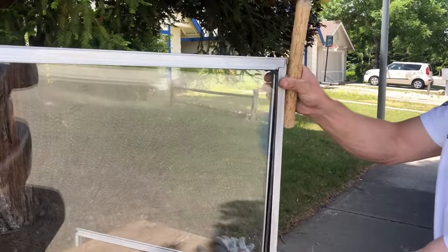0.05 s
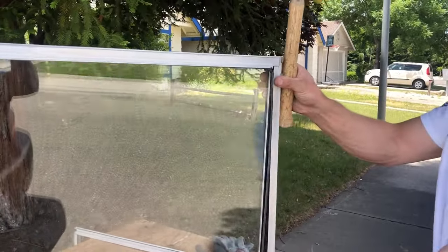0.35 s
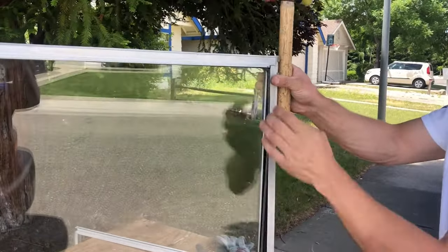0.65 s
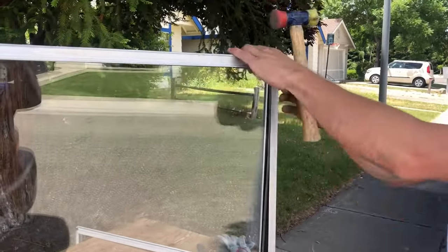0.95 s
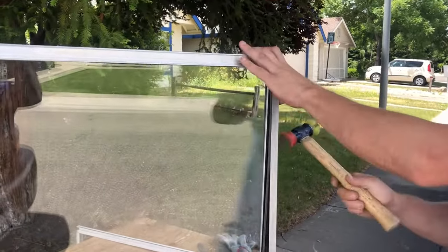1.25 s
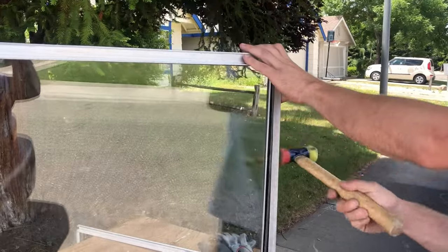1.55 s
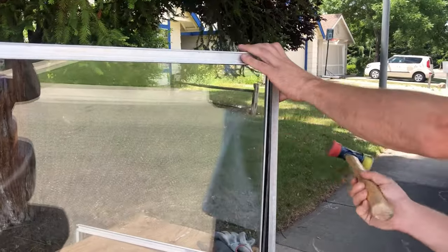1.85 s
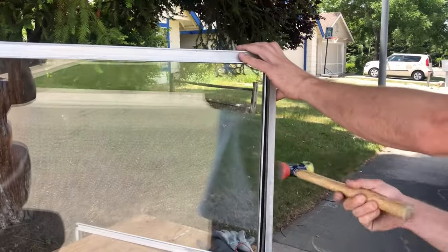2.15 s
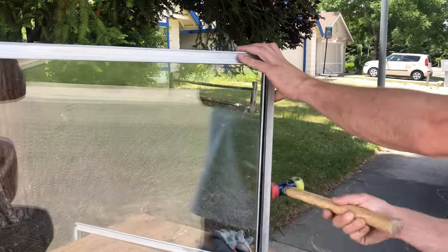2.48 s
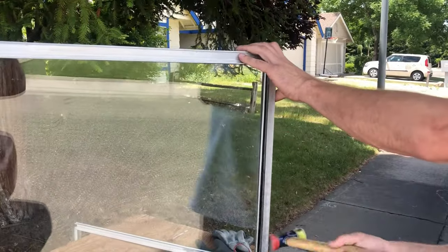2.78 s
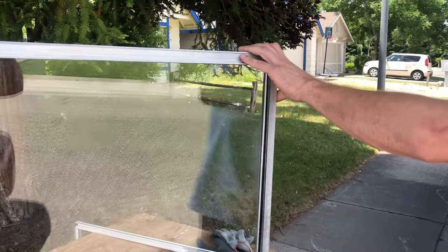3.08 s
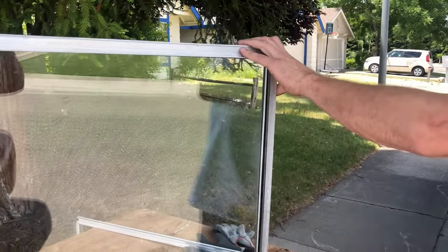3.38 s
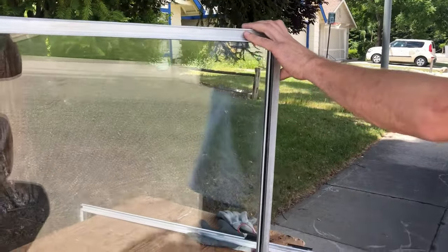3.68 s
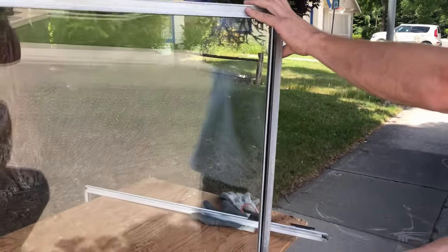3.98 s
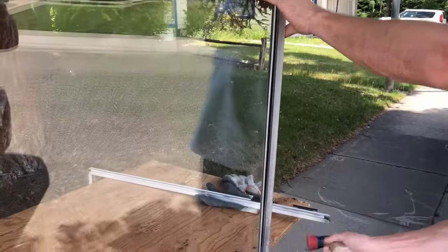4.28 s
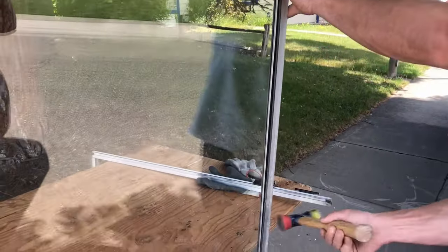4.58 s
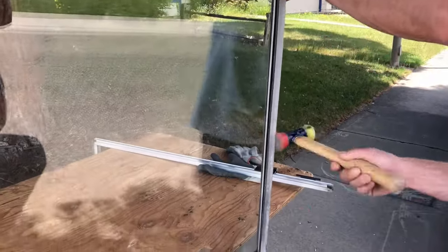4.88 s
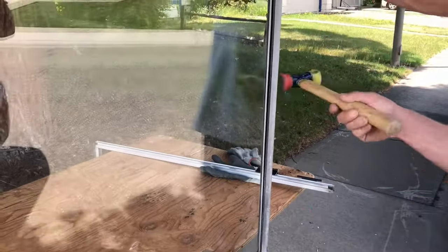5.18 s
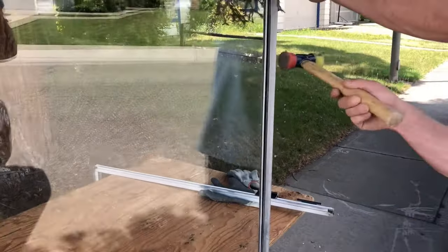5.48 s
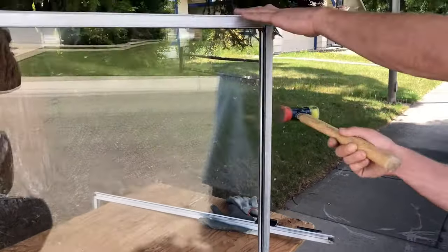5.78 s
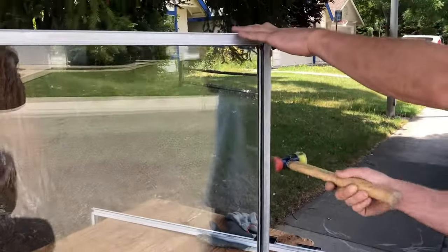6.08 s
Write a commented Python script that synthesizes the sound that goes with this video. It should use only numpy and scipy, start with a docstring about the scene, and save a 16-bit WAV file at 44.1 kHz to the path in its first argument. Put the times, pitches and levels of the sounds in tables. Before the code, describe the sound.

After a moment of quiet street air, a mallet strikes a metal window frame nearby, about three times a second. The frame cracks and buzzes against the glass, while the panes thump, ring briefly and knock on the table beneath. Small ticks follow as the frame settles. The early hits are brighter and the later ones stronger, with more bass. Distant traffic stays faint behind the outdoor work.

```python
"""Outdoors, on a table: a mallet taps an aluminium frame onto the edge of an upright glass unit.
Each blow sends a falling chirp of bending waves through the glass; the frame cracks and buzzes,
the panes ring on and rattle against the table. The frame ticks on the glass and a hand rubs on it.
Behind are a quiet street and one faint, high whistle."""
import sys
import numpy as np
from scipy import signal
from scipy.fft import rfft, irfft, next_fast_len
from scipy.io import wavfile
from scipy.ndimage import uniform_filter1d, minimum_filter1d, map_coordinates

SR = 44100
rng = np.random.default_rng(int(sys.argv[2]) if len(sys.argv) > 2 else 0)


def to_wav(sig):
    """Store sig (one row per channel, or 1-D mono) as 16-bit WAV at the path in sys.argv[1].

    Samples outside -1..1 are clipped; the rate is SR.
    """
    pcm = np.clip(np.atleast_2d(sig), -1, 1) * 32767
    pcm = np.round(pcm).astype(np.int16)
    wavfile.write(sys.argv[1], SR, pcm.T)  # frames by channels


N = 279389
AGE_S = np.arange(SR) / SR  # time since a contact
HZ = np.fft.rfftfreq(SR, 1 / SR)

# mallet blows: start_s, strength_db, clack_db, crack_db, mode_hz, mode_db
BLOWS = [(1.5714, -10, -23.5, -31, 168, -13.5), (1.9577, -5, -12.5, -20, 155.4, -13),
         (2.3939, -1, -12.5, -14.5, 180, -9.5), (2.7596, -1.5, -17.5, -22.5, 243.7, -10),
         (3.117, -6, -15.5, -12.5, 166, -19), (3.4644, -1.5, -18, -19.5, 248, -11.5),
         (3.7871, -1.5, -23.5, -19, 245.4, -13), (4.083, -2.5, -27.5, -22.5, 167, -26),
         (4.3554, -3, -24.5, -20.5, 446, -9), (4.6274, 5.5, -26, -23.5, 251.4, -10),
         (4.917, -5.5, -28.5, -20, 313, -15), (5.1845, 2.5, -22, -29, 234, -7),
         (5.4695, 8, -15, -28.5, 244, -17), (5.77, 5.5, -16, -46, 322, -8),
         (6.0641, 5.5, -17.5, -38, 235.5, -10.5)]
# pane modes: pitch_hz, level_db, t60_s
GLASS_MODES = [(92, -4, .55), (170, 0, .5), (244, -4, .42), (318, -6, .42), (351, -7, .42), (402, -10, .4),
               (452, -7, .42), (534, -14, .42), (640, -16, .4), (720, -14, .42), (1010, -15, .42),
               (1114, -19, .38), (1243, -22, .35), (1413, -26, .35), (1480, -25, .35), (1775, -28, .33)]


def mallet(lowest_hz=65.5):
    """Harder blows mostly add bass; the place struck along the frame picks the main mode."""
    blur_spectrum = [(60, -25), (200, 7.5), (380, 5), (1100, -11), (2200, -22.5), (5000, -33.5)]
    out = np.zeros(N)
    for start_s, strength_db, clack_db, crack_db, mode_hz, mode_db in BLOWS:
        thump_db = -17 + strength_db
        knock_db = -13 + 0.45 * strength_db
        ring_db = -39 + 0.39 * strength_db
        contact_s = 0.0028 / amp(0.21 * strength_db)  # harder is briefer
        mode = amp(mode_db) * np.sin(2 * np.pi * mode_hz * AGE_S) * fade(t60_s=0.15, attack_s=0.011)
        # waves that have met several edges
        blur = noise(blur_spectrum) * fade(t60_s=0.086, attack_s=0.0011)
        blur *= amp(knock_db) * (1 - burst(hold_s=0.0015))
        chirp = bending_wave(thump_db, knock_db, crack_db)
        metal = frame(clack_db, crack_db, contact_s)
        add(out, start_s, chirp + metal + mode + blur + amp(ring_db) * panes())
    # the unit is too small to radiate deep bass
    return signal.sosfilt(signal.butter(2, lowest_hz, 'highpass', fs=SR, output='sos'), out)


def bending_wave(thump_db, knock_db, crack_db, radiation_db=48):
    """A blow crosses the glass as a falling chirp; duller, inverted copies return from the edges."""
    # bending wave spectrum: freq_hz, level_db
    spectrum = [(20, -46.5), (60, -38.5), (110, 3.5), (220, 0.5), (400, -8), (800, -9.5), (1300, -15),
                (2200, -21), (2900, -25), (6000, -59), (16000, -22)]
    blow = [(250, thump_db), (750, knock_db), (1150, knock_db), (2200, (knock_db + crack_db) / 2)]
    pulse = amp(along(spectrum, HZ) + along(blow, HZ) + radiation_db)
    direct = dispersion(0.0029 * amp(0.4 * rng.standard_normal()))
    near_edge = 0.55 * np.exp(-2j * np.pi * HZ * 0.00629) / (1 + (HZ / 800) ** 2)
    echoes = sum(np.exp(-2j * np.pi * HZ * lag_s) for lag_s in rng.uniform(0.006, 0.03, size=3))
    far_edges = 0.21 * dispersion(0.00388) * echoes / (1 + (HZ / 1800) ** 2)
    bass_loss = 1 / (1 + (125 / (HZ + 1)) ** 4)  # air slips round the pane
    wave = pulse * bass_loss * direct * (1 - near_edge - far_edges)
    return irfft(wave * np.exp(1j * np.pi / 4), SR) * (AGE_S < 0.1)


def dispersion(travel_1khz_s):
    """Bending wave phase: speed grows with the root of frequency; 8 kHz arrives at time zero."""
    return np.exp(-2j * np.pi * travel_1khz_s * (2 * np.sqrt(1000 * HZ) - np.sqrt(1 / 8) * HZ))


def frame(clack_db, crack_db, contact_s):
    """Aluminium snaps against the glass, rings, buzzes and dies away in the yard."""
    # dull and bright contact spectra: freq_hz, level_db
    clack_spectrum = [(100, -48), (300, -12.5), (800, -9.5), (2000, -5), (2750, -17.5), (3400, -5),
                      (5000, -7), (6300, -21), (16000, -31.5)]
    crack_spectrum = [(100, -43), (400, -17.5), (1000, -5), (2000, 2), (2800, -7.5), (5500, -10),
                      (8300, -2), (11000, -6.5), (16000, -14)]
    # aluminium modes: pitch_hz, level_db, t60_s
    modes = [(3440, -9.5, 0.25), (3700, 4.5, 0.052), (3930, 3, 0.054), (5390, -12, 0.057),
             (8100, -17.5, 0.26)]
    clack = amp(clack_db) * snap(clack_spectrum, 1.34 * contact_s)
    crack = amp(crack_db) * snap(crack_spectrum, 1.12 * contact_s)
    ring = amp(clack_db - 16) * ringing(modes, spread=0.015) * rise(0.001)
    buzz_db = -15 + 0.6 * clack_db
    yard_db = np.mean([clack_db, crack_db, buzz_db, buzz_db]) - 21.5
    return clack + crack + ring + amp(buzz_db) * buzz() + amp(yard_db) * yard()


def snap(spectrum, hold_s):
    """A few ms of hard chatter between frame and glass."""
    chatter = rng.standard_normal(SR) * burst(hold_s)
    return unit(coloured(chatter, spectrum)) / 10


def buzz():
    """Clumps of tiny impacts and hiss in the frame's channel, ending as it settles."""
    # buzz spectrum: freq_hz, level_db
    spectrum = [(500, 3), (1800, -0.5), (2700, -11.5), (3500, -4.5), (5000, -6.5), (8000, -12),
                (16000, -18)]
    # buzz decay: freq_hz, t60_s
    decay = [(1500, .19), (4000, .2), (9000, .21), (16000, .19)]
    rate_hz = 2200
    impacts = (rng.random(SR) < rate_hz / SR) * rng.standard_normal(SR)
    clumps = amp(3 * noise([(60, 0), (150, -4), (400, -50)]))
    swarm = clumps * (unit(impacts) + rng.standard_normal(SR))
    return dying(unit(coloured(swarm, spectrum)), decay, attack_s=0.0024) * burst(hold_s=0.1)


def panes():
    """The glass rings in crowded modes, a few strong ones standing out."""
    # crowded mode spectrum: freq_hz, level_db
    spectrum = [(25, -52), (60, -10), (95, 1.5), (170, 4), (330, 6.5), (450, -2.5), (600, -9),
                (1100, -17.5), (1900, -26), (2700, -31.5), (8000, -49)]
    # crowded mode decay: freq_hz, t60_s
    decay = [(90, 1), (300, 0.42), (1000, 0.84), (3000, 0.88)]
    crowd = dying(noise(spectrum), decay, attack_s=0.0088)
    strong = ringing(GLASS_MODES, spread=0.004) * rise(0.008)
    return unit(crowd) + 1.1 * unit(strong)


def rattles():
    """The unit drops back on the table with hollow knocks that favour the higher modes."""
    # hard drops: start_s, level_db
    drops = [(1.6297, -27), (1.6635, -24), (1.6888, -27.5), (2.4585, -33), (2.925, -33), (3.53, -28.5),
             (3.901, -21), (4.2268, -26), (4.466, -25), (4.7009, -24.5), (5.252, -28.5), (5.5627, -21),
             (5.8583, -28), (6.129, -30.5)]
    # knock and low body spectra: freq_hz, level_db
    knock_spectrum = [(200, -10), (600, 8), (1100, 7.5), (1900, 1), (2700, -12.5), (3600, -12),
                      (7000, -27.5), (16000, -48.5)]
    body_spectrum = [(25, -40), (90, 12), (200, 0), (380, 4.5), (700, -35.5), (3000, -77)]
    out, size = np.zeros(N), SR // 4
    high_modes = [(hz, db, t60_s / 3) for hz, db, t60_s in GLASS_MODES if hz > 800]
    for start_s, level_db in drops + rocking():
        knock = noise(knock_spectrum, size) * fade(t60_s=0.105, attack_s=0.003)[:size]
        ring = 1.4 * ringing(high_modes, spread=0.015) * rise(0.002)
        body = 1.13 * noise(body_spectrum, size) * fade(t60_s=0.33, attack_s=0.01)[:size]
        add(out, start_s, amp(level_db) * (knock + ring[:size] + body))
    return out


def rocking(delay_s=0.046, period_s=0.04, first_db=-37, loss_db=5):
    """Four light, uneven, fading drops after each blow: start_s, level_db."""
    drops = []
    for blow_s, *_ in BLOWS:
        for k in range(4):
            jitter = rng.random() - 0.5
            drops.append((blow_s + delay_s + (k + jitter) * period_s, first_db - k * loss_db))
    return drops


def bumps():
    """Soft bumps of the unit: dull noise and one low tone."""
    # bumps: start_s, level_db, pitch_hz
    thuds = [(.752, -42, 290), (5.083, -24, 120)]
    # bump spectrum: freq_hz, level_db
    spectrum = [(25, -18), (80, -9), (180, 4), (300, -19), (600, -41), (3000, -68)]
    out = np.zeros(N)
    for start_s, level_db, pitch_hz in thuds:
        bump = 0.33 * noise(spectrum) + np.sin(2 * np.pi * pitch_hz * AGE_S)
        add(out, start_s, amp(level_db) * bump * fade(t60_s=0.16, attack_s=0.004))
    return out


def ticks():
    """Short ticks of frame on glass; the loudest is the first blow's second clack."""
    # frame contacts: start_s, level_db, top_octave_db
    contacts = [(1.375, -39, 3), (1.575, -4.5, -25), (2.431, -17.5, -12), (2.801, -24, -9),
                (3.529, -29, -1), (4.68, -42, 13), (4.698, -29.5, 1), (4.72, -24, -3), (5.531, -25.5, -5),
                (5.811, -36, -1), (6.297, -38.5, -19)]
    # tick spectrum: freq_hz, level_db
    spectrum = [(500, 3), (2400, -8.5), (3500, -2), (6000, -7), (8500, -3.5), (16000, -18)]
    out, size = np.zeros(N), SR // 10
    envelope = fade(t60_s=0.03, attack_s=0.0003)[:size]
    settling = [(blow_s + rng.uniform(0.1, 0.31), rng.normal(-44.5, 1.1), -12) for blow_s, *_ in BLOWS]
    for start_s, level_db, top_octave_db in contacts + settling:
        tilted = [(hz, db + along([(4000, 0), (8000, top_octave_db)], hz)) for hz, db in spectrum]
        add(out, start_s, amp(level_db) * noise(tilted, size) * envelope)
    return out


def hand():
    """Skin sticks and slides on the frame in short, grainy swells of hiss."""
    # strokes: centre_s, sigma_s, level_db
    rubs = [(0.34, 0.014, -60.5), (0.869, 0.015, -59), (1.196, 0.047, -59)]
    strokes = sum(amp(level_db) * swell(centre_s, sigma_s) for centre_s, sigma_s, level_db in rubs)
    grain = amp(3 * noise([(60, 0), (200, -6), (600, -50)], N) - 2)
    hiss = noise([(1000, -22), (3800, 2), (5500, -2), (7500, 3), (10000, -3), (16000, -7)], N)
    return strokes * grain * hiss


def yard():
    """The yard answers a blow with a diffuse tail."""
    # reverberation spectrum: freq_hz, level_db
    spectrum = [(500, -10), (2700, -5), (3600, 0), (6000, -6), (9000, -13), (12000, -22), (16000, -34)]
    # reverberation decay: freq_hz, t60_s
    decay = [(1000, .6), (4000, .62), (8000, .44), (16000, .18)]
    return dying(noise(spectrum), decay, attack_s=0.0061)


def whistle(pitch_hz=7400, level_db=-68):
    """A thin, wavering tone far away, perhaps a small bird."""
    waver_hz = 130 * noise([(200, 2), (600, -24.5), (1500, -81)], N)
    tone = np.sin(2 * np.pi * np.cumsum(pitch_hz + waver_hz) / SR)
    return amp(level_db) * swell(centre_s=3.0, sigma_s=0.06) * tone


def street(level_db=-48.5, drift_db=0.392):
    """Distant traffic and air, drifting slowly in level."""
    # street spectrum: freq_hz, level_db
    spectrum = [(15, -35.5), (25, -22), (53, -0.5), (149, -2), (180, -7.5), (206, -7), (373, -12.5),
                (545, -11.5), (591, -17), (641, -10.5), (1040, -12), (1370, -14), (2690, -28),
                (12200, -46.5), (16000, -61)]
    drift = map_coordinates(rng.standard_normal(N // 8192 + 4), [np.arange(N) / 8192])
    return amp(level_db + drift_db * drift) * noise(spectrum, N)


def amp(db):
    """dB to gain."""
    return 10 ** (np.asarray(db) / 20)


def unit(x):
    """x at rms 1."""
    return x / np.sqrt(np.mean(x ** 2) + 1e-20)


def along(points, hz):
    """Interpolate (freq_hz, value) points on a log axis."""
    freq_hz, values = np.transpose(points)
    return np.interp(np.log(hz + 1), np.log(freq_hz + 1), values)


def add(track, start_s, sound):
    """Mix sound in at start_s."""
    start = min(max(round(start_s * SR), 0), N)
    track[start:start + len(sound)] += sound[:N - start]


def noise(spectrum, size=SR):
    """Noise of rms 1, shaped by (freq_hz, level_db) points."""
    gain = amp(along(spectrum, np.fft.rfftfreq(size, 1 / SR)))
    return unit(irfft(rfft(rng.standard_normal(size)) * gain, size))


def rise(attack_s):
    """Exponential rise to 1."""
    return 1 - np.exp(-AGE_S / attack_s)


def fade(t60_s, attack_s):
    """Quick rise, exponential decay."""
    return amp(-60 * AGE_S / t60_s) * rise(attack_s)


def burst(hold_s):
    """Sharp onset, steep fall past hold_s."""
    return rise(0.000037) / (1 + (AGE_S / hold_s) ** 3)


def swell(centre_s, sigma_s):
    """Gaussian envelope in scene time."""
    return np.exp(-((np.arange(N) / SR - centre_s) / sigma_s) ** 2 / 2)


def ringing(modes, spread):
    """Damped modes; level, phase and (slightly) pitch vary per contact."""
    out = np.zeros(SR)
    for hz, db, t60_s in modes:
        pitch_hz = hz * rng.normal(1, spread)
        envelope = amp(rng.normal(db, 3) - 60 * AGE_S / t60_s)
        out += envelope * np.sin(2 * np.pi * (pitch_hz * AGE_S + rng.random()))
    return out


def coloured(x, spectrum):
    """Minimum-phase filter: a body answers only after it is struck."""
    cepstrum = irfft(np.log(amp(along(spectrum, HZ))), SR)
    cepstrum[1:SR // 2] *= 2
    cepstrum[SR // 2 + 1:] = 0
    return irfft(rfft(x) * np.exp(rfft(cepstrum)), SR)


def dying(x, decay, attack_s):
    """After a quick rise, each frequency of x dies at its own rate."""
    hz, age_s, bands = signal.stft(x, SR, nperseg=256)
    bands *= amp(-60 * age_s / along(decay, hz)[:, None])
    return signal.istft(bands, SR, nperseg=256)[1][:SR] * rise(attack_s)


def scene():
    """All sources, mono."""
    return (mallet() + rattles() + bumps() + ticks() + hand() + whistle() + street())[None]


def record(dry):
    """Fast peak limiter, then a steep low-pass."""
    ceiling, window_samples, top_hz = 0.95, 65, 16000
    needed = np.minimum(1, ceiling / (np.abs(dry) + 1e-9))
    gain = uniform_filter1d(minimum_filter1d(needed, window_samples), window_samples)
    size = next_fast_len(N + SR)
    lowpass = 1 / (1 + (np.fft.rfftfreq(size, 1 / SR) / top_hz) ** 120)
    return irfft(rfft(dry * gain, size) * lowpass, size)[:, :N]


dry = scene()
out = record(dry)
to_wav(out)
```